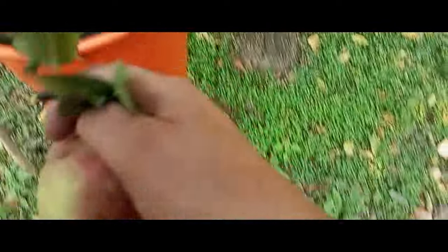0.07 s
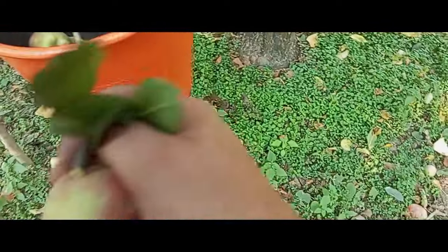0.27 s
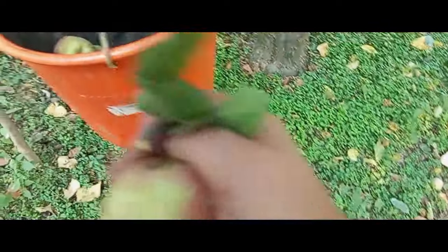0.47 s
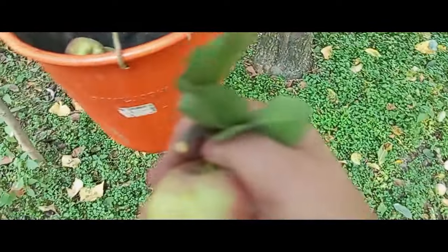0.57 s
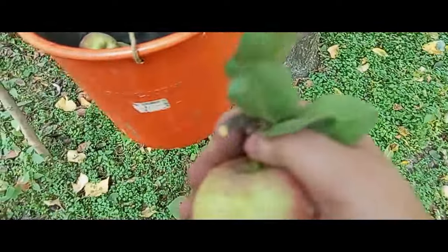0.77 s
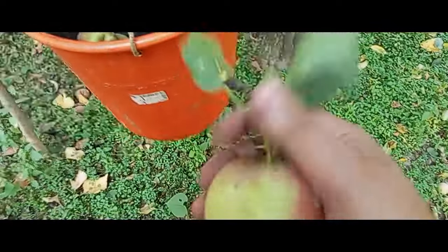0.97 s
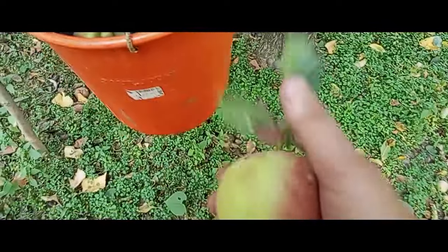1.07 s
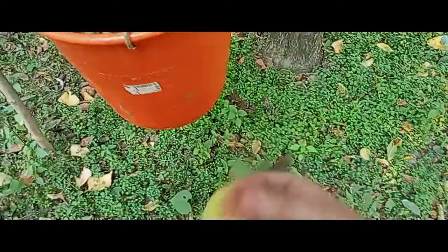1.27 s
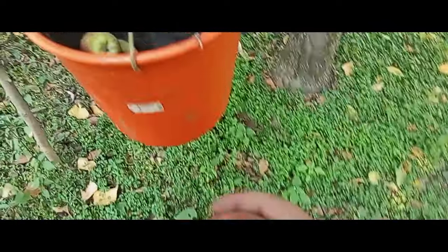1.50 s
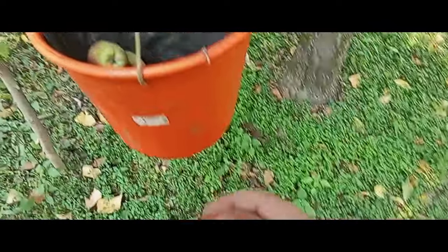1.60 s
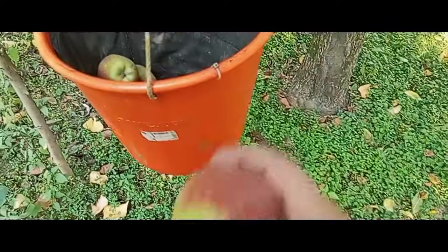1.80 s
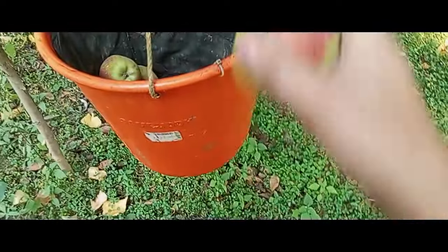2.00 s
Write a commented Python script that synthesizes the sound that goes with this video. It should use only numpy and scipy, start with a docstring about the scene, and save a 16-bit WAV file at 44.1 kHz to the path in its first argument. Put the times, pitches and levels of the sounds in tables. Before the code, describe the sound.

A twig snaps sharply off a hand-held apple, very close, after a few tiny ticks. Leaves brush softly over the fingers, then the sprig lands with a light knock. A small bird chirps faintly in the quiet garden.

```python
"""Small fibre ticks and a brush of leaves, very close, then the sharp snap of an apple's twig breaking off.
The snap is a crack of tearing fibres with a short woody ring. Leaves slip over the fingers, the hand
holding the apple makes a low rumble, and the dropped sprig lands in the ground cover with a soft knock.
Behind it, a small bird whistles five rising calls over the distant hush of a garden."""
import sys
import numpy as np
from scipy import signal
from scipy.fft import rfft, irfft, next_fast_len
from scipy.io import wavfile
from scipy.ndimage import map_coordinates

SR = 44100
rng = np.random.default_rng(int(sys.argv[2]) if len(sys.argv) > 2 else 0)


def bounce(signal):
    """Save signal as a 16-bit WAV file at the path given by the first command-line argument."""
    frames = np.transpose(np.atleast_2d(signal))
    limited = np.clip(frames, -1, 1)
    pcm = np.round(limited * 32767).astype(np.int16)
    wavfile.write(sys.argv[1], SR, pcm)


N = 90404

# Tone of the garden bed, a low drone and an airy layer. Each row: frequency in Hz, level in dB.
DRONE_TONE = [(20, -25), (31, -24), (48, -25.5), (85, 4), (130, -0.5), (175, 0.5), (215, -2.5), (290, -2.5),
              (325, 1.5), (365, -3.5), (470, -4.5), (540, -3.5), (700, -8), (900, -14.5), (1500, -36.5),
              (4000, -57)]
AIR_TONE = [(500, -10), (1060, -2.5), (1180, 4.5), (1380, 3), (1550, 2.5), (2100, -0.5), (2700, -10.5),
            (3250, -5.5), (4000, -13.5), (4500, -17.5), (5200, -22.5), (6300, -20), (7600, -29),
            (9500, -30.5), (12000, -35), (15500, -38)]
# Their slow level rides. Each row: time in seconds, level in dB.
DRONE_RIDE = [(0, -58), (.35, -54), (1.3, -55.5), (2.05, -56.5)]
AIR_RIDE = [(0, -58), (.47, -57.5), (.58, -55.5), (.9, -55.5), (1.15, -58), (1.28, -54), (1.5, -55),
            (1.8, -55.5), (2.05, -57)]
# Tone of the reflections off leaves and ground. Each row: frequency in Hz, level in dB.
REFLECTION_TONE = [(300, 28), (2400, -12), (3500, 1), (6300, 7), (8000, 2), (15000, -13)]

# The bird's calls. Each row: start in seconds, length in seconds, level in dB.
BIRD_CALLS = [(0.439, .062, -56.5), (0.584, .047, -57.5), (0.709, 0.043, -58.5), (1.052, 0.05, -56),
              (1.238, .053, -55)]
# The glide they all share. Each row: fraction of the call's length, pitch in Hz, relative level in dB.
CALL_GLIDE = [(0, 3100, -9), (.1, 3280, -4), (.35, 3800, 0), (.64, 4080, 0), (.75, 4400, -11),
              (.87, 4850, -14), (1, 5150, -20)]
CALL_WAVER_HZ, BIRD_WET_DB, BIRD_T60_S = 110, -1, .3

# Raw hand shake, before it is evened out and reshaped. Each row: frequency in Hz, level in dB.
SHAKE_TONE = [(20, -40), (45, -9), (65, 8.5), (85, 5), (105, 3.5), (135, -35), (180, -13.5), (300, -29),
              (800, -72)]
# Level ride of the hand's rumble. Each row: time in seconds, level in dB.
RUMBLE_RIDE = [(0, -55), (.2, -86), (.27, -52.5), (.32, -40), (.39, -43.5), (.44, -57.5), (.53, -53.5),
               (.565, -56), (.595, -43.5), (.63, -55.5), (.68, -55), (.8, -62), (1.5, -88), (1.59, -57),
               (1.66, -81), (2.05, -62)]

# Leaves brushing skin and ground. Each row: peak time, rise and release in seconds, peak level in dB,
# tilt in dB per octave.
LEAF_BRUSHES = [(0.044, 0.059, 0.099, -57, 0), (.13, 0.15, 0.11, -61.5, 0), (0.257, 0.035, 0.019, -51, 3),
                (0.308, 0.059, 0.031, -44.5, -0.5), (.41, 0.04, 0.062, -56.5, 0.5),
                (0.441, 0.019, 0.028, -54, 1), (0.924, 0.036, 0.057, -50.5, 2.5),
                (1.055, 0.14, 0.026, -71.5, 11), (1.156, 0.027, 0.043, -59, 4),
                (1.249, 0.058, 0.019, -52.5, -3), (1.401, 0.0079, 0.014, -54, -3),
                (1.56, 0.099, 0.062, -55.5, -3.5), (1.682, 0.02, 0.06, -47.5, 3.5),
                (1.735, 0.018, 0.078, -56, 1), (1.951, 0.025, 0.036, -56.5, -1.5),
                (2.004, 0.033, 0.043, -55.5, -2.5)]
# Tone of leaf friction. Each row: frequency in Hz, level in dB.
LEAF_TONE = [(300, -8.5), (1000, -9), (2300, 3), (3500, 3), (4800, -6.5), (6300, -3), (7800, -12),
             (10000, -14), (11500, -21.5), (14000, -20), (16000, -35)]
BRUSH_EDGE_DB = 16  # drop from the peak at the outer ends of rise and release
SLIPS_PER_S, SLIP_POWER_SHARE = 2400, .65
CRINKLE_DB, CRINKLE_S = 2, 0.0032  # depth and time scale of the flutter in a brush
SWISH_PEAK_S, SWISH_HALF_S, SWISH_DB = 1.05, 0.056, -71.5
SWISH_HZ, SWISH_RISE_HZ_PER_S, SWISH_WIDTH_HZ = 7300, 18000, 1100
LANDING_S, LANDING_DB, LANDING_HZ, LANDING_T60_S = 1.6677, -42.5, 794, 0.034

# Tone of tearing fibres. Each row: frequency in Hz, level in dB.
CRACK_TONE = [(300, -46), (1000, -42), (1700, 11), (3500, -0.5), (6500, -0.5), (8000, -1.5), (10000, 2),
              (11500, -8), (13800, -4.5), (15000, -3), (16300, -21)]
# Ticks of fibres and leaf stalks. Each row: start in seconds, gain in dB, ring pitch in Hz,
# crack gain over the ring in dB, crack tilt in dB per octave.
FIBRE_TICKS = [(.0378, -23, 3900, -5, 1), (0.0726, -32.5, 5700, -2.5, -5), (0.1106, -44, 9600, -1, 3),
               (0.1153, -37.5, 3580, -16, 0), (0.1259, -34.5, 6000, 6, 2), (0.1453, -46, 6150, -1, -5),
               (0.1505, -34, 11500, 2, 8.5), (.1654, -42.5, 5700, 0.5, -4.5), (0.4023, -39, 3880, -14.5, 7),
               (0.414, -35.5, 3850, -12, 5), (0.4421, -34, 5560, -21, -11), (.789, -54.5, 6070, 8.5, -2.5),
               (0.953, -43, 7900, -10, 1), (.969, -36, 2600, -7, -7), (1.258, -48, 6170, -13, 0),
               (1.319, -54.5, 12500, -5, 8), (1.6422, -47.5, 5640, -5, -3), (1.6611, -34, 3540, -30, -2),
               (1.6676, -25, 3850, -10, -8.5), (1.682, -32.5, 4840, -13, -6), (1.688, -35, 7100, -22, 0),
               (1.9982, -42, 3400, 7, 0.5)]
TICK_T60_S, TICK_CRACK_T60_S, TICK_ATTACK_S = 0.0059, 0.0055, .0001
# The breaking twig's modes. Each row: frequency in Hz, relative level in dB, 60 dB decay time in seconds.
TWIG_MODES = [(1545, -15.6, 0.0105), (2232, -1.1, 0.0075), (2511, 0.2, 0.0083), (3144, -7.5, 0.0092),
              (3599, -11.7, 0.0125), (3970, -10.8, 0.01), (4528, -14.4, 0.0089), (5011, -13.9, 0.0077),
              (5783, -14.8, 0.0076), (6517, -11.9, 0.007), (7605, -22.0, 0.0062), (9473, -19.7, 0.0057),
              (10269, -20.6, 0.0081), (13558, -13.6, 0.0034)]
SNAP_S, SNAP_GAIN_DB, SNAP_ATTACK_S = .2372, -6.5, 0.00026
SNAP_CRACK_DB, SNAP_CRACK_T60_S = -17.5, 0.015

NEAR_WET_DB, NEAR_T60_S = -8, 0.041
TWIG_LOW_CUT_HZ, HIGH_CUT_HZ = 1000, 16200


def amp(db):
    return 10 ** (np.asarray(db) / 20)


def unit(x):
    return x / np.sqrt(np.mean(x ** 2) + 1e-20)


def clock():
    return np.arange(N) / SR


def colour(x, tone, tilt_db=0):
    """EQ x with a curve of (Hz, dB) points and a tilt per octave, then bring it to rms 1."""
    size = next_fast_len(len(x) + 8192)
    octave = np.log2(np.fft.rfftfreq(size, 1 / SR) + 1)
    hz, db = np.transpose(tone)
    gain = amp(np.interp(octave, np.log2(hz), db) + tilt_db * octave)
    return unit(irfft(rfft(x, size) * gain, size)[:len(x)])


def noise(tone):
    """Coloured noise of rms 1."""
    return colour(rng.standard_normal(N), tone)


def ride(points):
    """A fader move through (seconds, dB) points."""
    return amp(np.interp(clock(), *np.transpose(points)))


def fade(t, t60):
    """Exponential decay, 60 dB in t60."""
    return np.exp(-np.log(1000) * t / t60)


def wobble(step_s):
    """A smooth random curve with one knot per step."""
    return map_coordinates(rng.standard_normal(N // 8), [clock() / step_s], mode="wrap")


def add(out, start_s, sound):
    """Mix a sound in at its cue."""
    part = out[max(round(start_s * SR), 0):][:len(sound)]
    part += sound[:len(part)]


def reflections(x, t60):
    """A diffuse tail off leaves and ground, with 3 ms of pre-delay."""
    t = np.arange(SR // 2) / SR
    tail = colour(rng.standard_normal(len(t)), REFLECTION_TONE) * fade(t, t60) * (t > .003)
    return signal.fftconvolve(x, tail / np.linalg.norm(tail))[:N]


def garden_hush():
    """The distant bed: a low drone and airy noise drift separately in level."""
    return noise(DRONE_TONE) * ride(DRONE_RIDE) + noise(AIR_TONE) * ride(AIR_RIDE)


def bird():
    """Short upward whistles, loudest in mid-glide, smeared by the trees."""
    out = np.zeros(N)
    fraction, pitch, level = np.transpose(CALL_GLIDE)
    for start_s, length_s, db in BIRD_CALLS:
        progress = (clock() - start_s) / length_s
        hz = np.interp(progress, fraction, pitch) + CALL_WAVER_HZ * wobble(step_s=.003)
        swell = amp(db + np.interp(progress, fraction, level)) * (progress > 0) * (progress < 1)
        out += swell * np.sqrt(2) * np.sin(2 * np.pi * np.cumsum(hz) / SR)
    return out + amp(BIRD_WET_DB) * reflections(out, BIRD_T60_S)


def hand_rumble():
    """The moving hand makes a low, even rumble, strongest after the jolt of the break."""
    shake = signal.hilbert(noise(SHAKE_TONE))
    evened = shake.real / (np.abs(shake) + .5)  # compressed by its own envelope
    rumble = colour(evened, tone=[(25, -14), (50, -8), (200, -1), (600, -13)])
    return rumble * ride(RUMBLE_RIDE)


def leaf_swish():
    """A leaf edge slides along a finger: a narrow band of friction noise that climbs in pitch."""
    t = clock() - SWISH_PEAK_S
    hz = SWISH_HZ + SWISH_RISE_HZ_PER_S * t
    band = unit(wobble(.5 / SWISH_WIDTH_HZ) * np.sin(2 * np.pi * np.cumsum(hz) / SR))
    return band * amp(SWISH_DB - 10 * (t / SWISH_HALF_S) ** 2)


def leaf_brushes():
    """Leaves rub on skin and ground: each brush is a swell of tiny slips on a smooth hiss."""
    out, t = np.zeros(N), clock()
    for peak_s, rise_s, release_s, db, tilt_db in LEAF_BRUSHES:
        slips = unit((rng.random(N) < SLIPS_PER_S / SR) * rng.standard_normal(N))
        hiss = rng.standard_normal(N)
        friction = np.sqrt(SLIP_POWER_SHARE) * slips + np.sqrt(1 - SLIP_POWER_SHARE) * hiss
        from_peak = np.maximum((peak_s - t) / rise_s, (t - peak_s) / release_s)
        swell = amp(db + CRINKLE_DB * wobble(CRINKLE_S) - BRUSH_EDGE_DB * from_peak ** 1.61)
        out += swell * colour(friction, LEAF_TONE, tilt_db)
    return out


def sprig_landing():
    """The sprig meets soft ground: one damped tone makes the knock."""
    out, t = np.zeros(N), np.arange(SR // 10) / SR
    knock = np.sin(2 * np.pi * LANDING_HZ * t) * fade(t, LANDING_T60_S)
    add(out, LANDING_S, amp(LANDING_DB) * knock)
    return out


def crack(t, t60, tilt_db=0):
    """Tearing fibres: a short, bright burst of noise."""
    return colour(rng.choice([-1., 1.], len(t)), CRACK_TONE, tilt_db) * fade(t, t60)


def fibre_ticks():
    """Each fibre or stalk gives a tiny crack and rings for a few milliseconds."""
    out, t = np.zeros(N), np.arange(SR // 20) / SR
    attack = 1 - np.exp(-t / TICK_ATTACK_S)
    for start_s, db, hz, crack_db, tilt_db in FIBRE_TICKS:
        ring = np.sin(2 * np.pi * hz * t) * fade(t, TICK_T60_S)
        tear = amp(crack_db) * crack(t, TICK_CRACK_T60_S, tilt_db)
        add(out, start_s, amp(db) * (ring + tear) * attack)
    return out


def twig_snap():
    """The twig breaks: a crack over heavily damped wood modes of alternating polarity."""
    out, t = np.zeros(N), np.arange(SR // 20) / SR
    attack = 1 - np.exp(-t / SNAP_ATTACK_S)
    ring = sum((-1) ** k * amp(db) * np.sin(2 * np.pi * hz * t) * fade(t, t60)
               for k, (hz, db, t60) in enumerate(TWIG_MODES))
    tear = amp(SNAP_CRACK_DB) * crack(t, SNAP_CRACK_T60_S)
    add(out, SNAP_S, amp(SNAP_GAIN_DB) * (ring + tear) * attack)
    return out


def scene():
    """Twig and leaves up front, the garden behind, in mono; a thin twig radiates little bass."""
    low_cut = signal.butter(2, TWIG_LOW_CUT_HZ, "high", fs=SR, output="sos")
    hits = signal.sosfilt(low_cut, twig_snap() + fibre_ticks()) + sprig_landing()
    near_tail = amp(NEAR_WET_DB) * reflections(hits, NEAR_T60_S)
    mix = hits + near_tail + leaf_brushes() + leaf_swish() + bird() + hand_rumble() + garden_hush()
    return mix[None]


def record(dry):
    """A steep high cut takes the very top off the mix."""
    size = next_fast_len(N + 8192)
    gain = 1 / (1 + (np.fft.rfftfreq(size, 1 / SR) / HIGH_CUT_HZ) ** 120)
    return irfft(rfft(dry, size) * gain, size)[..., :N]


dry = scene()
out = record(dry)
bounce(out)
```